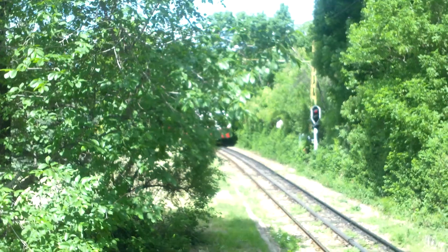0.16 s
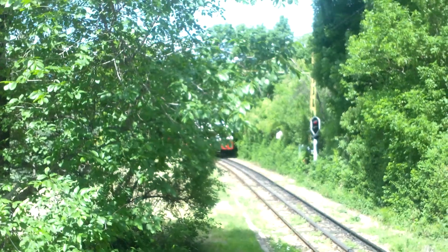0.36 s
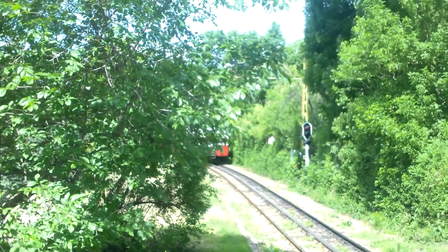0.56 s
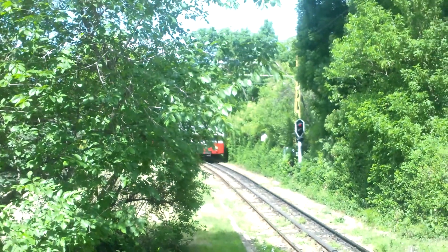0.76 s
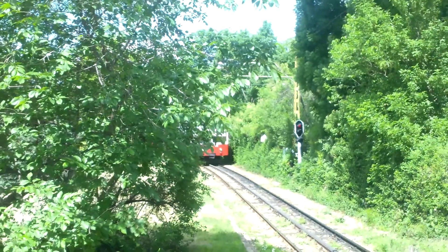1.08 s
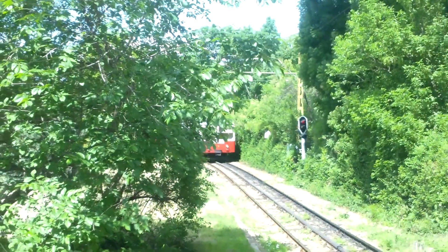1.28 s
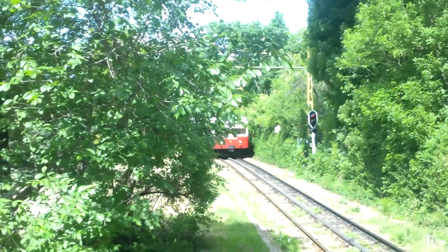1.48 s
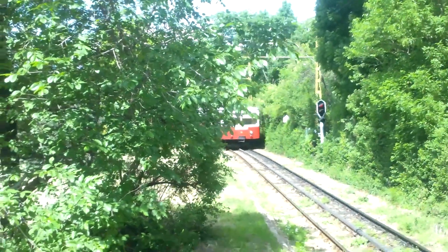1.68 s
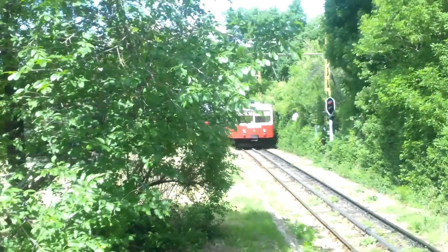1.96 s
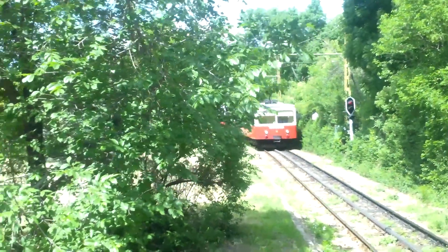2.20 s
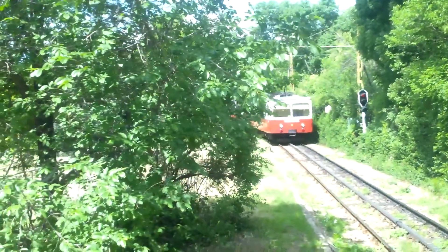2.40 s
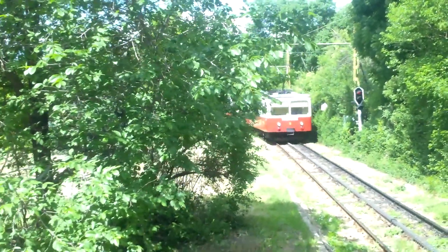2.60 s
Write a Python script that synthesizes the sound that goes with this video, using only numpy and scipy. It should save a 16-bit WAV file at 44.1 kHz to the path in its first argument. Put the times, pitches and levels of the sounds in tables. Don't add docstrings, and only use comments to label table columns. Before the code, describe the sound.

An electric train approaches outdoors among trees, heard by a small camera microphone. After a brief silence, low rumble and hissy wheel whir cut in, with irregular joint thuds, metal ticks, rattles and short thin squeals.

```python
import sys
import numpy as np
from scipy import signal
from scipy.io import wavfile
from scipy.ndimage import uniform_filter1d

SR = 44100
rng = np.random.default_rng(int(sys.argv[2]) if len(sys.argv) > 2 else 0)


def store_pcm(level_fs):
    pcm = np.round(np.clip(level_fs, -1, 1) * 32767).astype(np.int16)
    wavfile.write(sys.argv[1], SR, np.atleast_2d(pcm).T)


def ratio(d):
    e = np.asarray(d, float) / 20
    return 10 ** e


N = 120834
T_S = np.arange(N) / SR


def evened(x):
    return x / np.sqrt(np.mean(x ** 2) + 1e-20)


def smoothed(x, size):
    once = uniform_filter1d(x, size=size, mode="wrap")
    return uniform_filter1d(once, size=size, mode="wrap")


def read(points, hz):
    f, value_db = np.transpose(points)
    at = np.log2(hz + 1)
    outside_oct = np.maximum(np.log2(f[0]) - at, 0) + np.maximum(at - np.log2(f[-1]), 0)
    return np.interp(at, np.log2(f), value_db) - 60 * outside_oct


def curve(rows):
    s, value = np.transpose(rows)
    return np.interp(T_S, s, value)


def noise(colour, size, patchy_db, flicker_db):
    frames = 4 * N // size + 5
    hz = np.fft.rfftfreq(size, 1 / SR)
    a, b, patches = rng.standard_normal((frames, len(hz), 3)).T
    patches = uniform_filter1d(patches, size=size // 100 + 1, axis=0)
    patches = evened(uniform_filter1d(patches, size=8000 // size + 2, axis=1))
    flicker = evened(uniform_filter1d(rng.standard_normal(frames), size=4))
    level_db = read(colour, hz)[:, None] + patchy_db * patches + flicker_db * flicker
    z = (a + 1j * b) * ratio(level_db)
    return evened(signal.istft(z, nperseg=size, noverlap=size * 3 // 4)[1][:N])


def resonate(x, hz, width_hz):
    turn = np.exp(2j * np.pi * np.cumsum(hz * np.ones(len(x))) / SR)
    r = np.exp(-np.pi * width_hz / SR)
    slow = signal.lfilter([1], np.convolve([1, -r], [1, -r]), x / turn)
    return evened((turn * slow).real)


def ringing(modes, waver_db):
    waver = evened(smoothed(rng.standard_normal((len(modes), N)), 3000))
    return sum(ratio(db + waver_db * w) * resonate(rng.standard_normal(N), hz, width_hz)
               for (hz, width_hz, db), w in zip(modes, waver))


def swells(rows, width_hz):
    out = np.zeros(N + SR)
    for start_s, length_s, hz, db in rows:
        u = np.arange(0, length_s, 1 / SR) / length_s
        tone = resonate(rng.standard_normal(len(u)), hz, width_hz)
        out[round(start_s * SR):][:len(u)] += ratio(db) * np.sin(np.pi * u ** 0.65) * tone
    return out[:N]


# [freq_hz, density_db]
HISS_COLOUR = [(5000, -31), (8500, -2.5), (10700, -4.5), (15100, -6), (15600, -6)]


def mic_hiss():
    return ratio(-64) * noise(HISS_COLOUR, size=512, patchy_db=1.0, flicker_db=1.0)


# [time_s, level_db]
RUMBLE_LEVEL = [(0.2, -27.5), (0.55, -25), (0.57, -36), (0.6, -17), (0.72, -37), (0.76, -24), (0.95, -31.5),
                (0.98, -24), (1.06, -32), (1.36, -25), (1.68, -28), (1.71, -27), (1.74, -30), (2.08, -26.5),
                (2.16, -35), (2.21, -26.5), (2.63, -29), (2.74, -25.5)]
# [freq_hz, density_db]
RUMBLE_COLOUR = [(11, -35), (18, 0.5), (48, 9.5), (100, -11.5), (130, -47), (220, -120)]
# [time_s, pitch_hz]
DRONE_PITCH = [(.2, 41.5), (.45, 43), (.75, 38.8), (1.1, 43.5), (1.4, 40.3), (1.68, 42.4), (1.78, 58.4),
               (2.08, 56.3), (2.18, 43), (2.4, 39.9), (2.74, 40.6)]


def rumble():
    x = noise(RUMBLE_COLOUR, size=4096, patchy_db=0.9, flicker_db=1.0)
    x = x + ringing([(curve(DRONE_PITCH), 9.1, -3.5)], waver_db=1.5)
    power = uniform_filter1d(uniform_filter1d(x ** 2, size=1000), size=1000)
    own_level = np.sqrt(power) + 0.058
    return ratio(curve(RUMBLE_LEVEL)) * evened(x / own_level ** 0.48)


# [start_s, length_s, pitch_hz, level_db]
GROANS = [(.22, 0.088, 205, -35), (.62, 0.21, 106, -39), (1.2, 0.13, 100, -34), (1.75, 0.37, 93, -31.5),
          (2.03, 0.044, 264.3, -33), (2.33, 0.13, 65, -32), (2.62, 0.12, 61, -35.5),
          (1.54, 0.23, 139.2, -36.5), (1.9, 0.21, 140, -36), (1.93, 0.11, 198.5, -38.5),
          (1.92, 0.095, 280, -39)]


def groans():
    return swells(GROANS, width_hz=19.5)


# [pitch_hz, level_db]
MOTOR_TONES = [(140, -40.5), (210, -42.5), (282, -46)]


def motor():
    from_s, to_s, ramp_s, off_db = 1.52, 2.5, 0.038, -11
    drifts = rng.standard_normal((1 + len(MOTOR_TONES), N))
    pitch, *levels = evened(smoothed(drifts, 2500))
    pulling = np.clip(np.minimum(T_S - from_s, to_s - T_S) / ramp_s, 0, 1)
    turned_s = np.cumsum(1 + 0.008 * pitch) / SR
    hum = sum(ratio(db + 1.6 * w) * np.sin(2 * np.pi * hz * turned_s)
              for (hz, db), w in zip(MOTOR_TONES, levels))
    return np.sqrt(2) * ratio(off_db * (1 - pulling)) * hum


# [time_s, level_db]
ROLL_LEVEL = [(.2, -31.5), (.45, -32), (.6, -35.5), (.75, -34), (.9, -32.5), (1.2, -36), (1.46, -35),
              (1.62, -31.5), (1.78, -33.5), (2.0, -32), (2.18, -34.5), (2.34, -33), (2.5, -35), (2.74, -32)]
# [freq_hz, density_db]
ROLL_COLOUR = [(47, -31), (80, -2), (275, -7.5), (383, -14.5), (479, -14.5), (520, -21.5), (606, -14),
               (1510, -19.5), (2200, -23), (2860, -53), (4840, -120)]
# [pitch_hz, width_hz, level_db]
RAIL_HUMS = [(473.2, 34, -19), (585.7, 55, -17.5), (768, 5.3, -24), (1342, 70, -22.5), (1736, 41, -23)]


def roll():
    level_db = curve(ROLL_LEVEL)
    mean_db = level_db.mean()
    level_db = mean_db + 0.96 * (level_db - mean_db) + 1.18
    body = noise(ROLL_COLOUR, size=1024, patchy_db=1.0, flicker_db=0.1)
    return ratio(level_db) * (body + ringing(RAIL_HUMS, waver_db=1.0))


# [time_s, level_db]
WHIR_LEVEL = [(0.2, -36.5), (0.28, -37), (0.35, -34.5), (0.53, -36), (0.55, -31), (0.57, -36), (0.97, -35),
              (1.25, -36), (1.56, -34), (1.59, -37.5), (1.7, -32), (1.9, -34.5), (2.01, -32.5),
              (2.28, -35.5), (2.35, -31), (2.48, -35), (2.72, -31), (2.74, -32.5)]
# [freq_hz, density_db]
WHIR_COLOUR = [(1060, -56), (1800, -13.5), (2240, -10.5), (2450, -2.5), (2960, -8), (3690, -0.5),
               (4250, -0.5), (4720, -2.5), (5600, -28), (7280, -43), (12300, -120)]
# [freq_hz, density_db]
FIZZ_COLOUR = [(3120, -21), (5300, -0.5), (5510, -5.5), (5950, -0.5), (6850, -6.5), (8150, -10),
               (9240, -24.5), (11000, -26.5), (14300, -48), (22000, -120)]
# [pitch_hz, width_hz, level_db]
WHEEL_MODES = [(2096, 42, -19), (2422, 47, -19.5), (2556, 40, -23.5), (3660, 92, -14), (3856, 74, -13.5),
               (4324, 270, -11), (5840, 220, -27.5), (7930, 200, -36.5)]


def whir():
    fizz_mean_db, fizz_rise_db_per_s = -52.5, 1.1
    level_db = curve(WHIR_LEVEL)
    body = noise(WHIR_COLOUR, size=256, patchy_db=1.3, flicker_db=0.28)
    body = body + ringing(WHEEL_MODES, waver_db=2.5)
    fizz = noise(FIZZ_COLOUR, size=256, patchy_db=1.2, flicker_db=1.34)
    fizz_db = fizz_mean_db + 0.96 * (level_db - level_db.mean())
    fizz_db = fizz_db + fizz_rise_db_per_s * (T_S - T_S.mean())
    return ratio(level_db) * body + ratio(fizz_db) * fizz


# [start_s, length_s, pitch_hz, level_db]
SQUEALS = [(.30, 0.2, 3700, -41.5), (.86, 0.17, 3660, -40), (.88, 0.053, 2414, -40),
           (1.66, 0.09, 2450, -54), (2.05, 0.18, 3680, -43), (2.298, 0.26, 2430, -42),
           (2.316, 0.1, 2600, -43), (2.535, 0.035, 4330, -37), (2.6, 0.061, 4270, -35),
           (2.6, .04, 7300, -62), (2.675, 0.077, 4220, -35), (2.7, .05, 3680, -37),
           (2.705, .035, 8000, -60), (2.715, .04, 6950, -52), (.35, 0.43, 7980, -69), (.85, .35, 7930, -66),
           (.9, .08, 3890, -41), (1.2, .35, 7950, -63), (2.3, 0.18, 3620, -45), (2.62, 0.1, 2444, -47)]


def squeals():
    return swells(SQUEALS, width_hz=130)


# [start_s, length_s, centre_hz, level_db]
SPRAYS = [(.8, 0.033, 8000, -60), (.92, .08, 6500, -56), (1.58, .19, 7000, -57), (1.97, .1, 7000, -59),
          (2.51, .05, 8500, -61), (2.6, 0.14, 7460, -59), (2.69, .12, 7000, -53), (2.64, .09, 10500, -65)]


def sprays():
    return swells(SPRAYS, width_hz=3000)


def chink():
    u = np.maximum(T_S - 0.512, 0)
    envelope = ratio(-59 - 60 * u / 0.05) * np.minimum(u / 0.003, 1)
    return envelope * resonate(rng.standard_normal(N), 14400, width_hz=900)


# [time_s, peak_db]
TICKS = [(.3107, -46), (.5756, -43), (.7741, -42), (.8258, -32), (1.1882, -44), (1.3254, -40),
         (1.5963, -40), (1.6985, -39), (1.8577, -32), (2.2777, -39), (2.5142, -43), (2.5925, -41),
         (2.617, -39)]


def ticks():
    pitch_hz, decay_s = 5500, 0.00022
    out = np.zeros(N)
    for time_s, peak_db in TICKS:
        u = np.maximum(T_S - time_s, 0)
        out += 2 * ratio(peak_db) * np.sin(2 * np.pi * pitch_hz * u) * np.exp(-u / decay_s)
    return out


# [start_s, length_s, pitch_hz, level_db]
KNOCKS = [(.8, .05, 290, -39), (.81, 0.034, 797, -37), (.805, .04, 144, -36), (1.2, 0.037, 680, -37),
          (1.3, 0.06, 276, -36), (0.347, .07, 270, -42), (2.49, 0.055, 765, -43.5)]


def knocks():
    return swells(KNOCKS, width_hz=100)


# [time_s, thud_db, thud_hz, rattle_db, ring_db]
JOINTS = [(0.321, -32, 200, -45, -42), (.437, -21, 180, -43, -35.5), (0.547, -33, 200, -47, -43),
          (0.706, -20.5, 230, -54, -49), (0.8125, -19, 190, -45, -35.5), (0.821, -19, 376, -52, -41),
          (0.824, -16, 405, -52, -44), (.900, -36, 200, -54, -32.5), (1.1128, -14.5, 407, -51, -43.5),
          (1.200, -27, 200, -40, -53), (1.525, -32, 230, -45, -55), (1.599, -40, 200, -36, -46),
          (1.661, -22.5, 380, -38, -33), (1.700, -30, 150, -36, -50), (1.858, -35, 200, -41, -38),
          (2.0479, -20, 406, -48, -35), (2.117, -25, 130, -45, -41), (2.315, -22.5, 400, -44, -37),
          (2.419, -41, 200, -38, -54), (2.521, -38, 200, -34, -37), (2.619, -36, 200, -33, -42),
          (2.659, -38, 200, -31.5, -33), (2.697, -30, 200, -42, -43)]
# [freq_hz, density_db]
RATTLE_COLOUR = [(500, 5), (2000, -19), (4000, 5), (5500, -5), (8000, -17.5), (11000, -29), (15500, -36)]
# [pitch_hz, width_hz, level_db]
RING_MODES = [(2380, 30, -8), (2600, 47, -11.5), (3660, 54, -1.8)]


def strikes(column, rise_s, t60_s):
    power = np.zeros(N)
    for row in JOINTS:
        u = np.maximum(T_S - row[0], 0)
        power += (ratio(row[column] - 60 * u / t60_s) * np.minimum(u / rise_s, 1)) ** 2
    return np.sqrt(power)


def joints():
    rise_s, fall_s, sag_s = 0.0026, 0.007, 0.0011
    thuds = np.zeros(N)
    for time_s, db, hz, _, _ in JOINTS:
        u = T_S - time_s
        turns = hz * sag_s * np.log1p(abs(u) / sag_s)
        envelope = np.exp(-abs(u) / np.where(u < 0, rise_s, fall_s))
        thuds -= ratio(db) * np.cos(2 * np.pi * turns) * envelope
    thuds = uniform_filter1d(thuds, size=10)
    rattle = noise(RATTLE_COLOUR, size=256, patchy_db=3.5, flicker_db=1.3)
    rattle = strikes(column=3, rise_s=0.011, t60_s=0.21) * rattle
    ring = strikes(column=4, rise_s=0.0084, t60_s=0.36) * ringing(RING_MODES, waver_db=0.5)
    return thuds + rattle + ring


def scene():
    ground = rumble() + groans()
    running = motor() + roll() + whir() + squeals() + sprays()
    blows = chink() + ticks() + knocks() + joints()
    return (mic_hiss() + ground + running + blows)[None]


def low_pass(x):
    return signal.sosfilt(signal.butter(12, 16580, fs=SR, output="sos"), x)


# [time_s, depth_db, recovery_s]
GAIN_DIPS = [(.838, -2, 0.12)]


def record(dry):
    dip_db = np.zeros(N)
    for time_s, depth_db, recovery_s in GAIN_DIPS:
        u = T_S - time_s
        dip_db += depth_db * np.clip(u / 0.022, 0, 1) * np.exp(-(np.maximum(u, 0) / recovery_s) ** 2)
    edge = signal.firwin(1023, 15740, window=("kaiser", 9), fs=SR)[None]
    padded = np.pad(dry * ratio(dip_db), ((0, 0), (511, 511)), "reflect", reflect_type="odd")
    x = signal.oaconvolve(padded, edge, "valid")

    start_s, push_s, ramp_s = 0.1912, 0.0015, 0.00004
    since_s = T_S - start_s
    swing = ratio(-19.5) - x[0, round(start_s * SR):][:4].mean()
    x = x + swing * np.exp(-np.maximum(since_s, 0) / push_s)
    x = x * np.clip(since_s / ramp_s, 0, 1)
    x = x - 0.7 * x[:, -1:] * np.exp((T_S - T_S[-1]) / 0.002)
    x = signal.filtfilt(signal.firwin(63, 16600, fs=SR), [1], x)
    return low_pass(x)


dry = scene()
out = record(dry)
store_pcm(out)
```